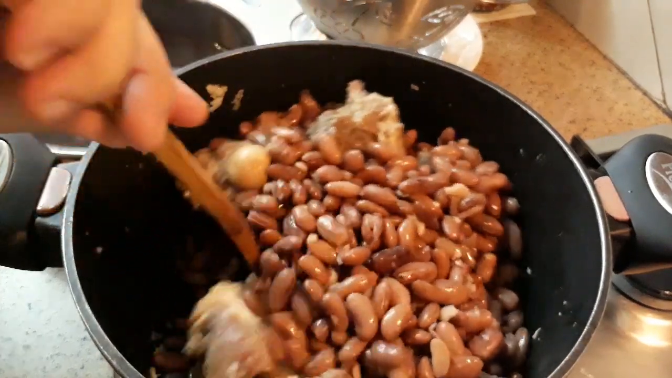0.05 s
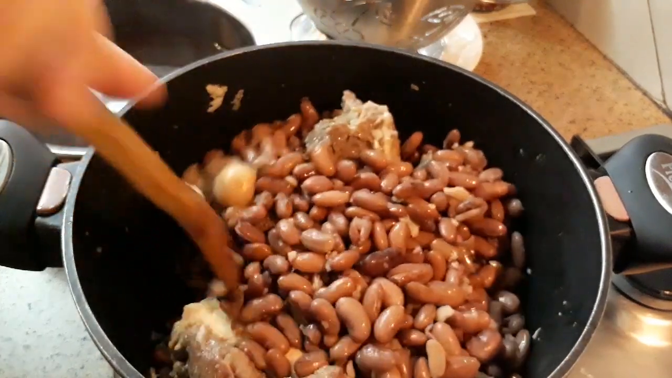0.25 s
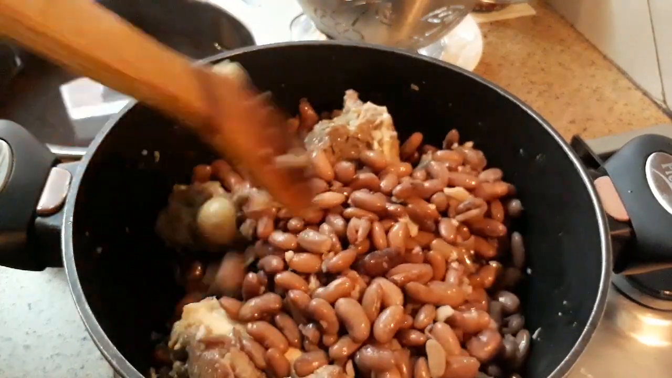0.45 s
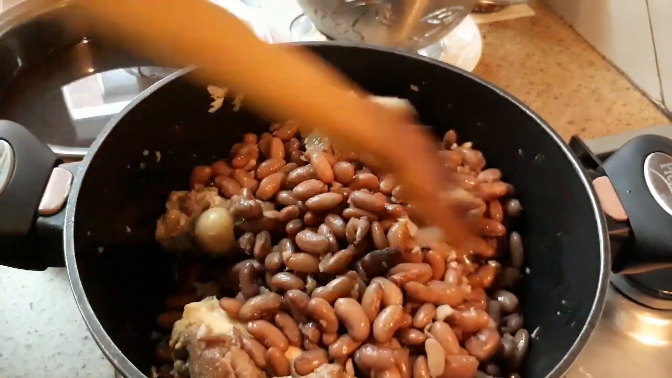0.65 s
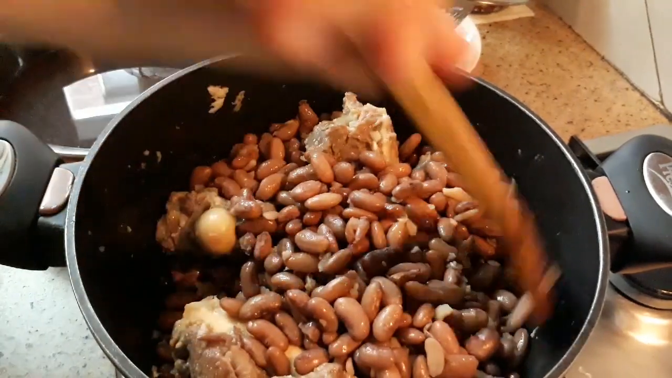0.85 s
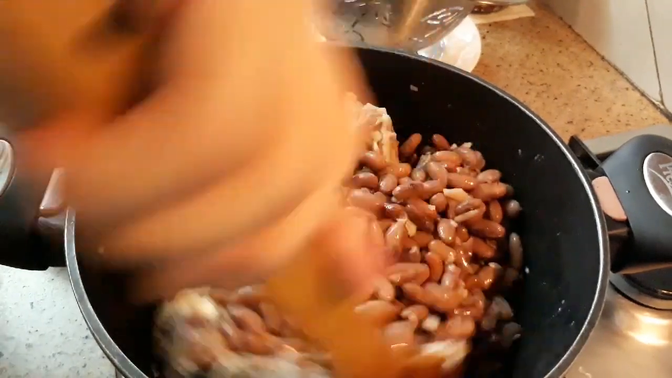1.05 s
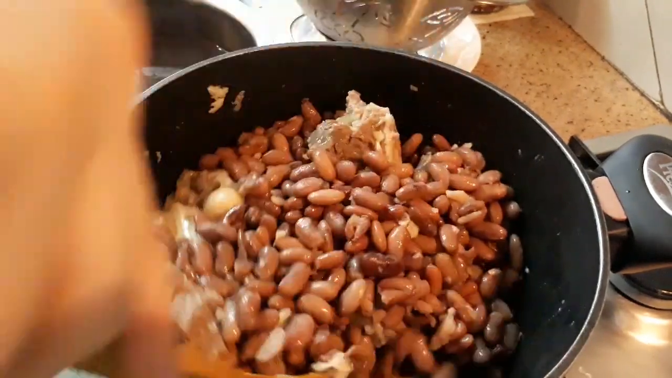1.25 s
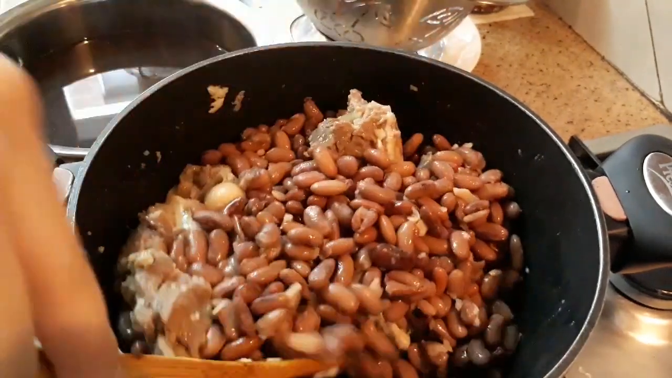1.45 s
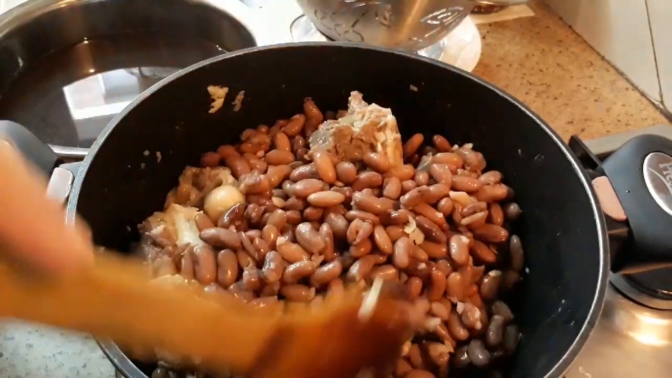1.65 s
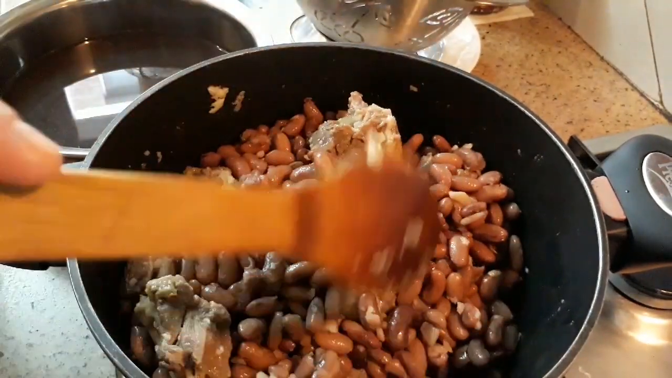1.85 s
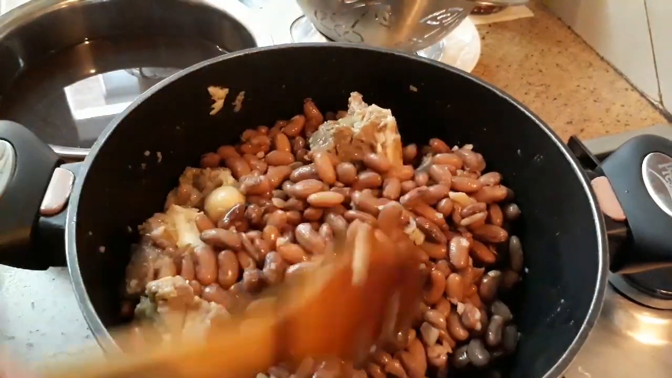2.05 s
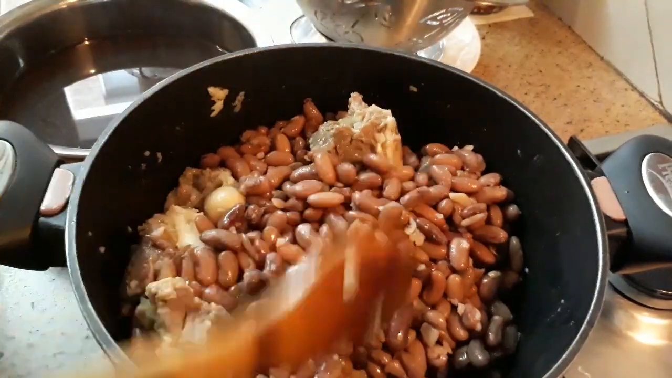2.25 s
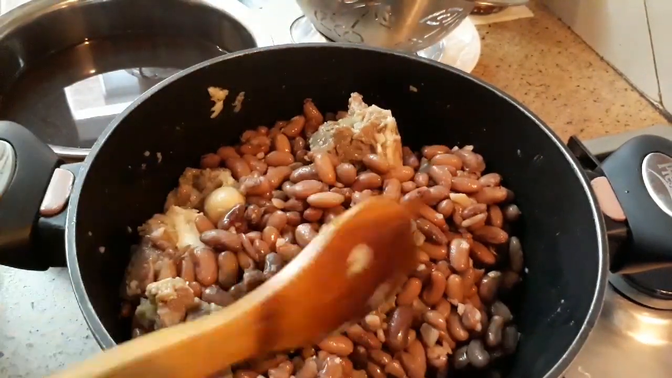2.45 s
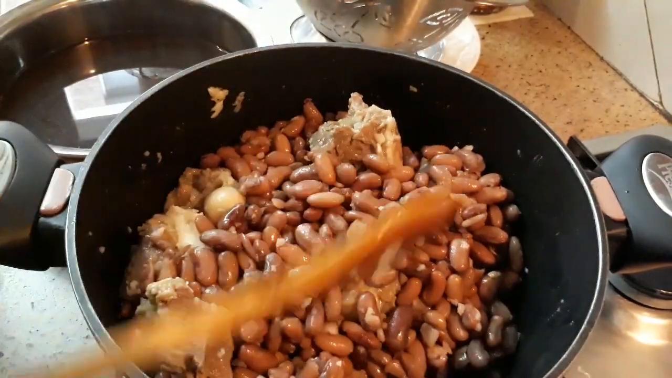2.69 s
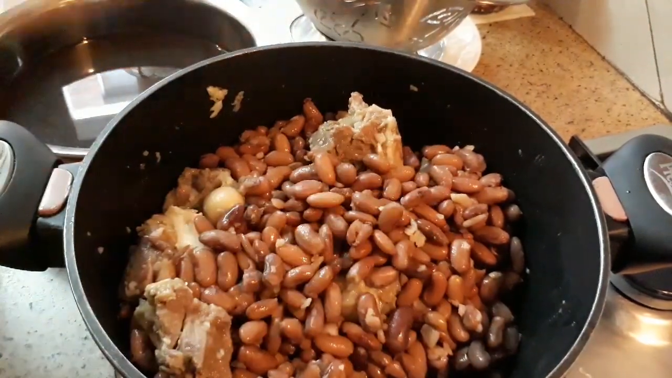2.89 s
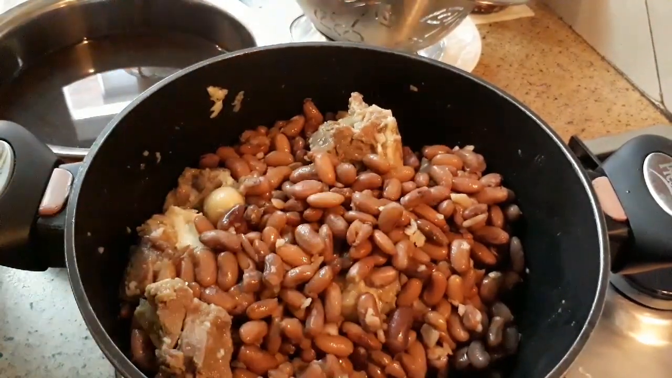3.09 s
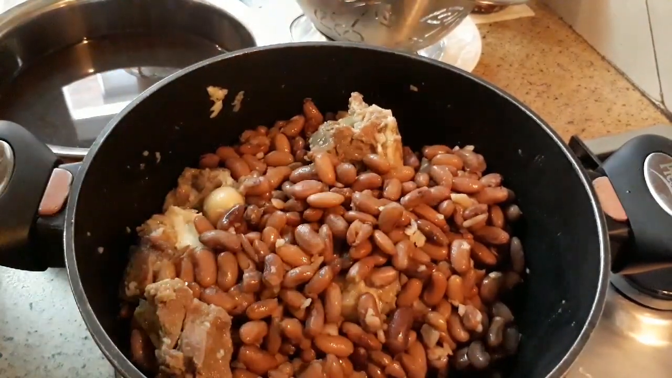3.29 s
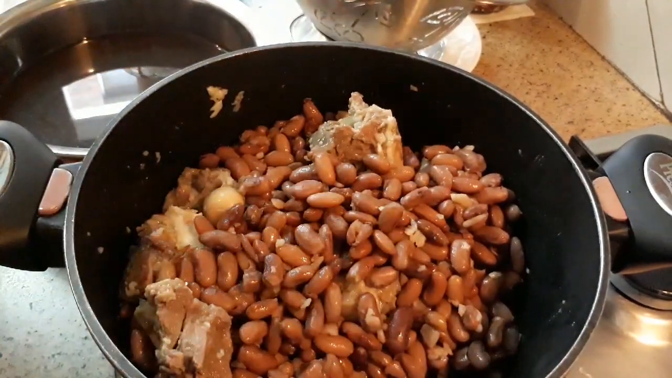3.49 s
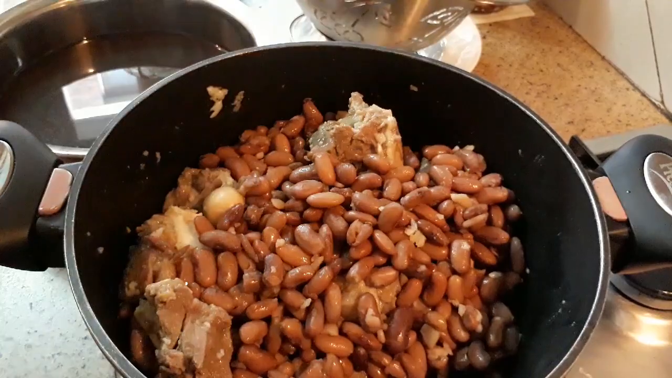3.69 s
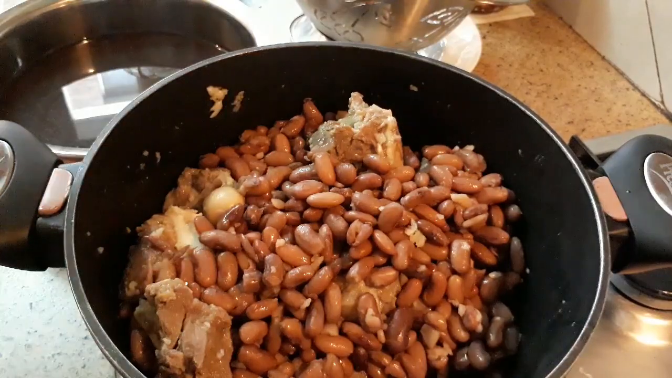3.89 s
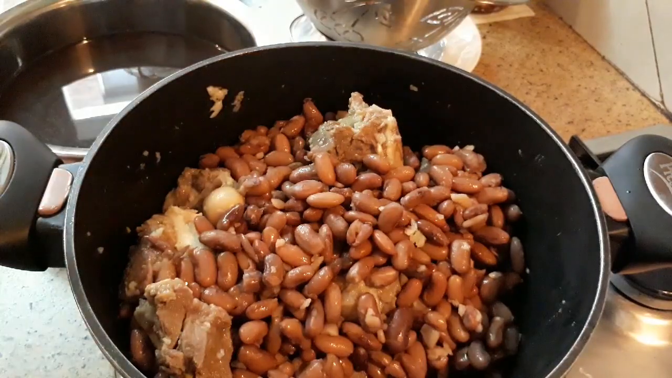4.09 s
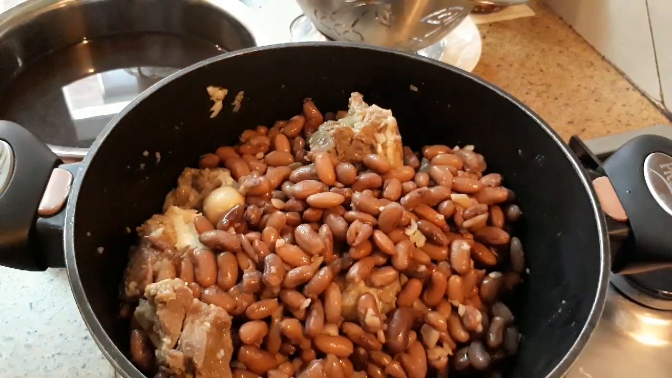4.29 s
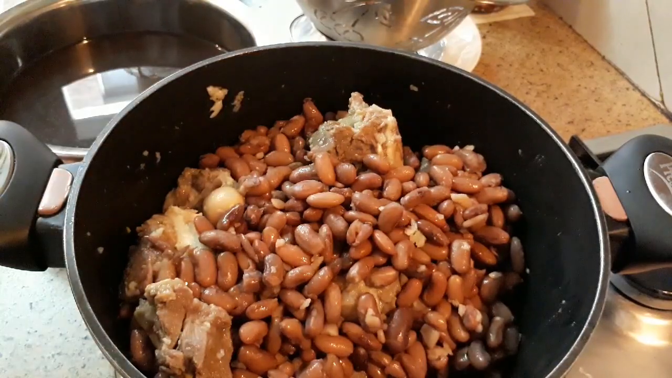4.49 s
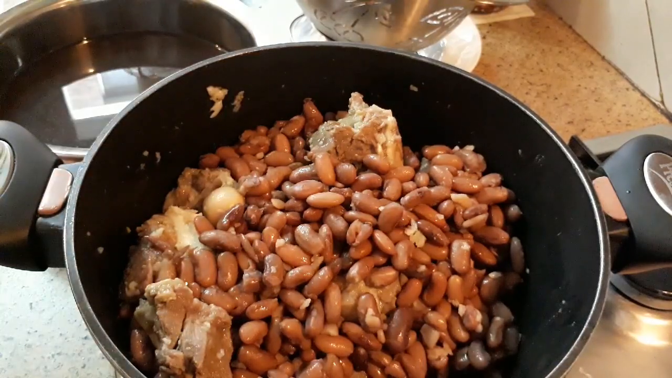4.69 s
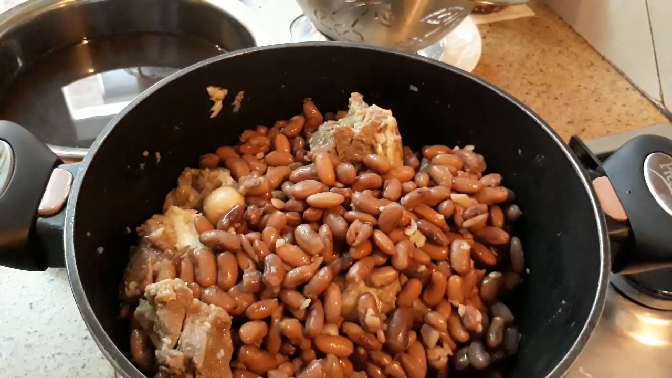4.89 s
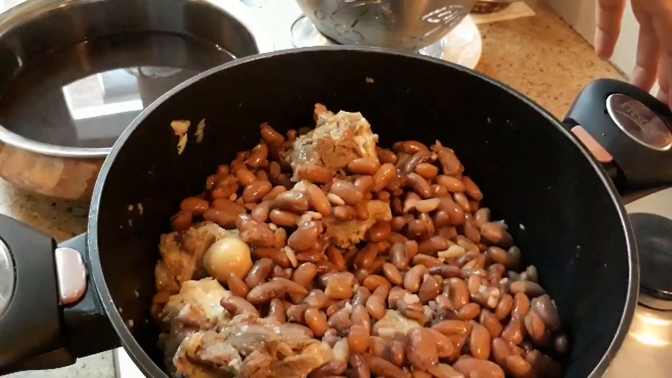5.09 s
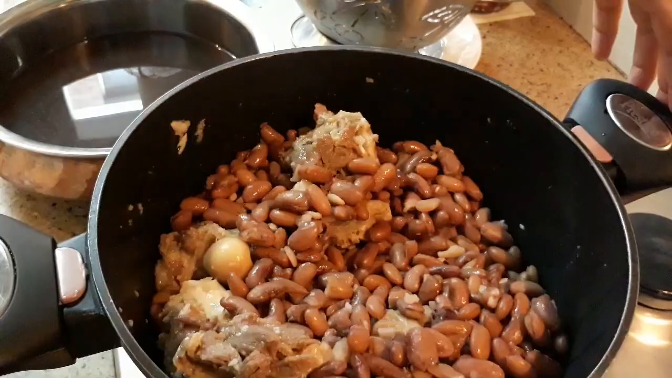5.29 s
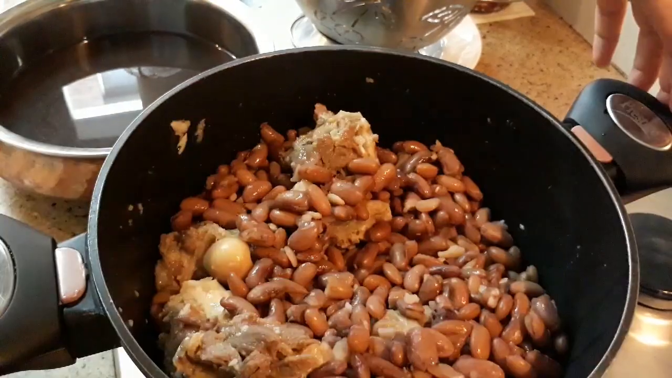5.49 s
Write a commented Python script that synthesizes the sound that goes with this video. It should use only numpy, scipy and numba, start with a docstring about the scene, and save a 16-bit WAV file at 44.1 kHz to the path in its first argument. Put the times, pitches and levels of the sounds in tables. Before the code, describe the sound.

A steady frying hiss with spitting fat, interrupted by four quick knocks of a wooden spoon against the pot.

```python
"""Beans and meat frying in a deep pot

Heard from just above the rim in a small kitchen: steam bubbles burst in the fat and ring the hollow
of the pot, drops of water spit, and the hiss flares as the food turns. A wooden spoon knocks the rim
four times; the gain ducks and creeps back. Runs of soft low ticks and a faint rumble sit underneath."""
import sys
import numpy as np
from scipy import signal
from scipy.fft import rfft, irfft
from scipy.io import wavfile
from scipy.ndimage import uniform_filter1d
from numba import njit

SR = 44100
rng = np.random.default_rng(int(sys.argv[2]) if len(sys.argv) > 2 else 0)


def wav_out(sig):
    """Save sig, one row per channel (or a flat mono array), as 16-bit PCM at SR to the path in sys.argv[1]."""
    wavfile.write(sys.argv[1], SR, np.round(np.clip(np.atleast_2d(sig).T, -1, 1) * 32767).astype(np.int16))


N = 244314
TIME = np.arange(N) / SR
FREQS = np.maximum(np.arange(4097) * SR / 8192, 1)

# Four bubble sizes, coarse to fine fizz. Each row: low edge in Hz, high edge in Hz, bursts per second.
BUBBLE_BANDS = [(100, 1150, 2000), (1150, 2400, 3000), (2400, 5200, 4000), (5200, 16000, 9000)]
# Their mix. Each row: resting level in dB, early lift in dB, share of a flare, drift in dB per second
# after the last knock, change in dB for a full microphone move.
BUBBLE_MIX = [(-36, 2, 0.36, 0, 1.4), (-38.5, 5, 0.04, 0.75, 1.5), (-37.5, -0.4, 0.57, 0.12, 2.6),
              (-39, -0.5, 0.8, -0.45, 3.1)]
# Air ringing in the pot. Each row: pitch in Hz, width in Hz, level in dB, dB shift per unit of movement.
POT_RESONANCES = [(728, 87, -2, -5), (834, 130, -2.5, -8), (930, 250, -13.5, 8.5), (1612, 286, -1.5, 3),
                  (1883, 490, -8.5, -0.5), (3257, 520, -6, -3.5), (3677, 420, -11, -5.5),
                  (4206, 250, -12.5, 2), (4540, 760, -14.5, -4), (6155, 410, -17, 1),
                  (6840, 530, -19.5, -2), (8500, 640, -18, -2), (9060, 340, -14, -5),
                  (9830, 220, -17.5, -9), (10450, 400, -18, -4), (11070, 340, -20.5, -8)]
# Tone of the frying that escapes straight up. Each row: frequency in Hz, gain in dB.
OPEN_AIR_EQ = [(100, -32), (400, -24), (560, -17.5), (1250, -13), (2500, -15), (3950, -24.5), (5000, -18.5),
               (7700, -23), (11200, -24), (12000, -28.5), (13200, -29), (15500, -32.5)]
# The microphone slides along the rim. Each row: time in seconds, share of the way from 0 to 1.
MIC_MOVE = [(5.09, 0.06), (5.18, 0.93)]
# Food turns or slips. Each row: start in seconds, length in seconds, flare it builds toward in dB.
FOOD_TURNS = [(-.05, 0.06, 14.5), (0.498, .08, 1), (1.056, 0.33, 6), (1.65, 0.47, 1.5), (3.148, 0.91, 0.96),
              (5.11, 0.072, 2)]
# Brief swells in the low, coarse bubbling. Each row: crest time and half-length in seconds, lift in dB.
COARSE_SWELLS = [(0.11, 0.1, 1.5), (1.597, 0.043, 2.5), (3.002, 0.13, 2.5), (4.247, 0.091, 2),
                 (5.04, 0.083, 2.5)]
# Tone of the rumble. Each row: frequency in Hz, relative gain in dB.
RUMBLE_EQ = [(20, -12), (50, -19), (90, -2), (145, 2), (210, -6.5), (400, -8.5), (900, -28)]
# Even runs of ticks. Each row: first and last tick in seconds, count, level in dB before the boost.
LOW_TICK_RUNS = [(.029, .029, 1, -30.5), (.212, .545, 3, -29.5), (.737, 1.254, 4, -29.5),
                 (1.547, 1.884, 3, -31), (2.92, 3.06, 2, -37), (3.204, 3.33, 2, -33),
                 (3.531, 3.531, 1, -30.5), (3.925, 4.054, 2, -31.5), (4.213, 4.94, 7, -33.5),
                 (5.099, 5.461, 4, -32)]
# Spitting fat. Each row: start in seconds, peak in dB, band centre in Hz, 60 dB decay in seconds.
FAT_SPITS = [(.102, -22, 7000, .01), (0.223, -22, 7000, .01), (1.192, -19, 3300, 0.011),
             (3.066, -28, 7000, .008), (4.042, -21, 12000, 0.012), (4.502, -25, 11000, .008),
             (4.697, -32, 6000, .006), (5.42, -24.5, 2900, 0.47)]
# Spoon on rim. Each row: start in seconds, level in dB, cut-off in Hz, spatter in dB, crack peak in dB.
SPOON_KNOCKS = [(2.0875, -9.5, 2480, -23.5, -26), (2.2834, -7.5, 3240, -22, -27),
                (2.4660, -8.5, 3400, -22.5, -17.5), (2.6469, -18, 900, -37, -22)]
# Ring of a knock: low room resonances under the higher tones of spoon and pot.
# Each row: pitch in Hz, relative level in dB, 60 dB decay in seconds.
KNOCK_MODES = [(152.6, -28.5, 0.68), (237.3, -15.5, 0.23), (305, -26, 0.28), (357, -22, 0.39),
               (482, -18.5, 0.35), (656, -7.5, 0.085), (742, -1.5, 0.17), (856, -21, 0.67),
               (1142, -6, 0.042), (1390, -13.5, 0.043), (1598, -9.5, 0.11), (1960, -11.5, 0.037),
               (4760, -16.5, 0.03), (5110, -17.5, 0.037)]
# Tone of the kitchen's answer to a knock. Each row: frequency in Hz, relative gain in dB.
KITCHEN_EQ = [(50, -34.5), (130, -12.5), (240, -10), (300, -11), (400, -10.5), (540, -5.5), (700, -2),
              (860, 3.5), (1050, -12), (1350, -20.5), (1650, -10), (2000, -16), (2500, -23.5),
              (4500, -21.5), (12000, -57)]


def undb(db):
    """Decibels to gain."""
    return 10 ** (np.asarray(db) / 20)


def unit(x):
    """Scale to rms 1."""
    return x / np.sqrt(np.mean(x ** 2))


def add(out, start_s, x):
    """Mix x into out from start_s."""
    i = max(int(start_s * SR), 0)
    out[i:i + len(x)] += x[:N - i]


def contour(points):
    """EQ curve through (Hz, dB) points."""
    hz, db = np.transpose(points)
    return undb(np.interp(np.log(FREQS), np.log(hz), db))


def below(hz, order):
    """Smooth low-pass curve."""
    return 1 / np.sqrt(1 + (FREQS / hz) ** (2 * order))


def above(hz, order):
    """Smooth high-pass curve."""
    return 1 / np.sqrt(1 + (hz / FREQS) ** (2 * order))


def colour(x, gain):
    """Minimum-phase EQ: it rings after a click, never before."""
    cepstrum = irfft(np.log(gain + 1e-6))
    half = len(cepstrum) // 2
    cepstrum[1:half] *= 2
    cepstrum[half + 1:] = 0
    impulse = irfft(np.exp(rfft(cepstrum)))[:half]
    return signal.fftconvolve(x, impulse)[:len(x)]


def fade(t, t60):
    """Exponential decay, 60 dB down after t60 seconds."""
    return np.exp(-np.log(1000) * t / t60)


def swell(start_s, length_s, rise_s, fall_s):
    """Envelope that builds toward 1 for length_s, then dies away."""
    t = np.maximum(TIME - start_s, 0)
    return (1 - np.exp(-t / rise_s)) * np.exp(-np.maximum(t - length_s, 0) / fall_s)


def wander(rate_hz):
    """Smooth random motion with rms 1."""
    knots = rng.standard_normal(2048)
    return unit(np.interp(TIME * rate_hz, np.arange(len(knots)), knots))


def bursts(per_s, spread_db):
    """Bubbles pop at random: most are tiny, a few are large."""
    size = undb(spread_db * np.minimum(rng.exponential(size=N), 6))
    return unit((rng.random(N) < per_s / SR) * size * rng.choice([-1, 1], N))


def wall_scatter(pops, wall_db=-2, t60=0.085):
    """Each pop bounces between the pot walls and picks up a short noisy tail."""
    energy = signal.fftconvolve(pops ** 2, fade(TIME[:SR // 10], t60) ** 2)[:N]
    return pops + undb(wall_db) * unit(np.sqrt(np.abs(energy)) * rng.standard_normal(N))


def hollow(moved=0):
    """The pot as an EQ: its resonances on top of the sound that escapes straight up."""
    power = sum((undb(db + moved * shift_db) / (1 + (2 * (FREQS - hz) / width) ** 2)) ** 2
                for hz, width, db, shift_db in POT_RESONANCES)
    return np.sqrt(power + contour(OPEN_AIR_EQ) ** 2)


def stirring():
    """Flare in dB: wet food on hot metal lifts the hiss, which sinks as the water boils off."""
    return sum(db * swell(start, length, rise_s=0.14, fall_s=0.3) for start, length, db in FOOD_TURNS)


def coarse_swells():
    """Lift in dB: the low, coarse bubbling swells briefly now and then."""
    return sum(db * np.exp(-((TIME - crest) / half) ** 2) for crest, half, db in COARSE_SWELLS)


def sizzle(surge_db=0.1, flutter_db=0.86, settle_s=1.52, drift_from_s=2.75):
    """Four swarms of bubbles ring the pot; they surge together as fat meets hot metal and flutter alone."""
    moved = np.interp(TIME, *np.transpose(MIC_MOVE))
    early, flare = np.exp(-(TIME / settle_s) ** 2), stirring()
    drift_s = np.maximum(TIME - drift_from_s, 0)
    levels = [rest_db + early_db * early + share * flare + drift * drift_s + moved_db * moved
              for rest_db, early_db, share, drift, moved_db in BUBBLE_MIX]
    levels[0] += coarse_swells()
    surge = surge_db * wander(rate_hz=24.06)
    out = np.zeros(N)
    for (low, high, per_s), db in zip(BUBBLE_BANDS, levels):
        pops = wall_scatter(bursts(per_s, spread_db=2.0))
        swarm = colour(pops, above(low, order=8) * below(high, order=8))
        # each spot above the pot favours other resonances
        swarm = (1 - moved) * colour(swarm, hollow()) + moved * colour(swarm, hollow(moved=0.8))
        out += unit(swarm) * undb(db + surge + flutter_db * wander(rate_hz=55))
    return out


def rumble(rest_db=-50.5, stir_share=0.24, swell_db=10):
    """A faint low bed around the stove that grows with the stirring and swells once later."""
    late_swell = swell(start_s=4.1, length_s=0.13, rise_s=0.042, fall_s=0.23)
    db = rest_db + stir_share * stirring() + swell_db * late_swell
    return unit(colour(rng.standard_normal(N), contour(RUMBLE_EQ))) * undb(db)


def ticks(boost_db=2.5, lead_s=0.00197, tail_db=-13, tail_t60=0.12):
    """Dull ticks, each a short push that swings back and leaves a brief low tail in the room."""
    out = np.zeros(N)
    t = TIME[:SR // 10]
    push = colour(1. * (t == 0), above(70, order=3) * below(446, order=2))
    push /= np.abs(push).max()
    tail_eq = above(97, order=4) * below(170, order=3)
    for first, last, count, db in LOW_TICK_RUNS:
        for start in np.linspace(first, last, count):
            tail = unit(colour(rng.standard_normal(len(t)), tail_eq)) * fade(t, tail_t60)
            add(out, start - lead_s, undb(db + boost_db) * (undb(tail_db) * tail - push))
    return out


def spits():
    """Drops of water explode in the fat with a bright snap or a short sputter."""
    out = np.zeros(N)
    t = TIME[:SR // 5]
    pot = hollow()
    for start, db, hz, t60 in FAT_SPITS:
        puff = rng.standard_normal(len(t)) * fade(t, t60)
        snap = colour(puff, pot * above(hz, order=4) * below(hz, order=3))
        add(out, start, undb(db) * snap / np.abs(snap).max())
    return out


def knock_ring(t, build_cycles=0.42, scatter_db=0.3, detune=0.003):
    """Low room resonances bloom under the higher tones of spoon and pot; no two blows ring alike."""
    chance = rng.standard_normal((len(KNOCK_MODES), 2))
    out = np.zeros(len(t))
    for k, ((hz, db, t60), (louder, higher)) in enumerate(zip(KNOCK_MODES, chance)):
        envelope = (1 - np.exp(-t * hz / build_cycles)) * fade(t, t60)
        tone = np.sin(2 * np.pi * hz * (1 + detune * higher) * t)
        out += (-1) ** k * undb(db + scatter_db * louder) * envelope * tone
    return unit(out)


def knocks(room_db=-0.4, room_rise_s=0.017, spatter_rise_s=0.0046):
    """Wood cracks against the rim: the modes ring, the kitchen answers and the jolted fat spatters."""
    out = np.zeros(N)
    t = TIME[:int(.7 * SR)]
    walls, pot = rng.standard_normal(len(t)), hollow()
    for start, db, contact_hz, spatter_db, crack_db in SPOON_KNOCKS:
        # some echoes stay the same, others change as the arm moves
        room = colour(walls + rng.standard_normal(len(t)), contour(KITCHEN_EQ))
        room = unit(room * fade(t, t60=0.33) * (1 - np.exp(-(t / room_rise_s) ** 2)))
        # a softer contact lasts longer and sounds duller
        contact_eq = below(contact_hz, order=1) * above(45, order=2)
        blow = colour(knock_ring(t) + undb(room_db) * room, contact_eq)
        add(out, start, undb(db) * blow / np.std(blow[:SR // 20]))  # the first 50 ms set the level
        crack = rng.standard_normal(len(t)) * fade(t, t60=0.047)
        crack = colour(crack, above(3700, order=3) * below(6600, order=2))
        add(out, start, undb(crack_db) * crack / np.abs(crack).max())
        pops = bursts(per_s=8300, spread_db=3.0)[:len(t)]
        spatter = unit(colour(pops, pot * above(2060, order=3)))
        envelope = fade(t, t60=0.62) * (1 - np.exp(-t / spatter_rise_s))
        add(out, start, undb(spatter_db) * spatter * envelope)
    return out


def thuds(relative_db=-18, low_hz=98, high_hz=140, t60=0.58, rise_s=0.033):
    """Each knock jolts the stove under the pot, which answers with a low thud."""
    out = np.zeros(N)
    t = TIME[:SR // 2]
    stove_eq = above(low_hz, order=4) * below(high_hz, order=4)
    for start, db, *_ in SPOON_KNOCKS:
        body = unit(colour(rng.standard_normal(len(t)), stove_eq))
        add(out, start, undb(db + relative_db) * body * fade(t, t60) * (1 - np.exp(-t / rise_s)))
    return out


@njit
def duck(excess_db, attack_s, recover_db_per_s):
    """Gain cut in dB: it chases the excess level, then creeps back at a steady rate."""
    out, cut = np.empty(len(excess_db)), 0.
    for i in range(len(excess_db)):
        if excess_db[i] > cut:
            cut += (excess_db[i] - cut) / (attack_s * SR)
        else:
            cut = max(cut - recover_db_per_s / SR, 0.)
        out[i] = cut
    return out


def scene():
    """The mono mix at one microphone above the pot."""
    return (sizzle() + spits() + knocks() + thuds() + ticks() + rumble())[None]


def record(dry, threshold_db=-20.5, top_hz=15600):
    """Automatic gain ducks after loud hits, a soft clip rounds the peaks and a low-pass trims the top."""
    power = np.abs(uniform_filter1d(dry[0] ** 2, SR // 100))
    level_db = 10 * np.log10(power + 1e-12)
    held = dry * undb(-duck(level_db - threshold_db, attack_s=0.21, recover_db_per_s=6))
    rounded = held / (1 + held ** 6) ** (1 / 6)
    return signal.sosfilt(signal.ellip(10, .1, 80, top_hz, fs=SR, output="sos"), rounded)


dry = scene()
out = record(dry)
wav_out(out)
```